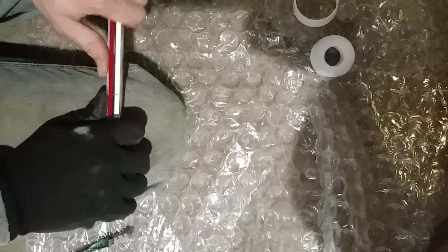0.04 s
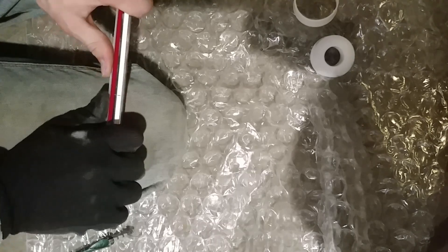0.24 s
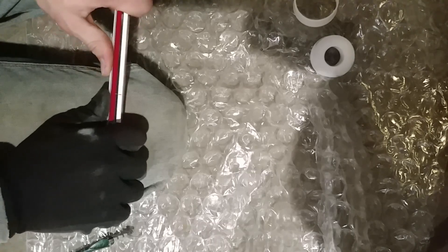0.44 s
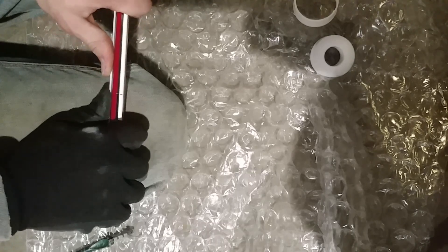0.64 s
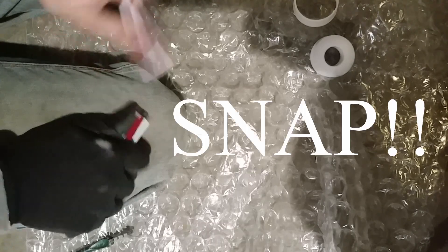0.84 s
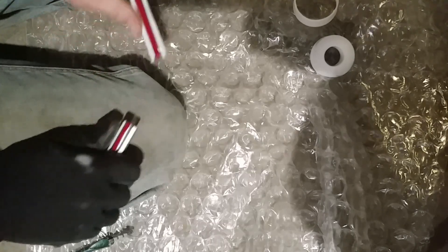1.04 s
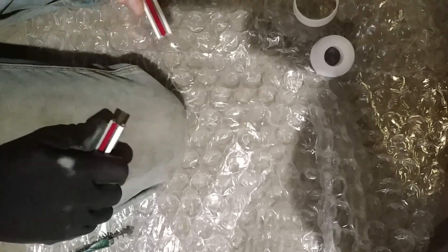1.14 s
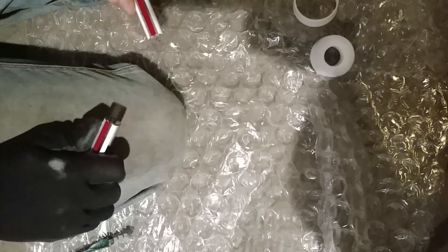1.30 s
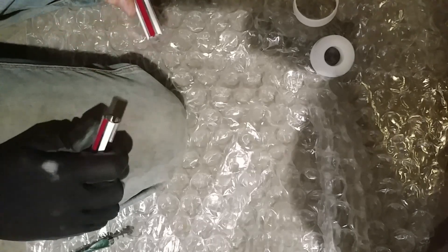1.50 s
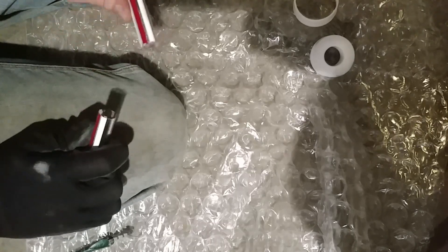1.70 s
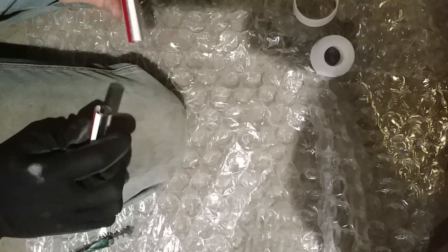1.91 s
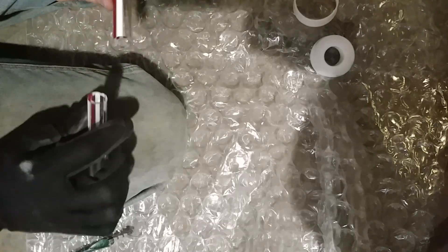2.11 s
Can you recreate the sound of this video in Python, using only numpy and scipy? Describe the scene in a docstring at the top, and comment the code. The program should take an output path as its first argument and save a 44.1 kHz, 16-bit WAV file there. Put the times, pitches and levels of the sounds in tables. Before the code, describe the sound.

A glass tube snaps in the hands at about 0.86 seconds: a very loud, abrupt, brittle crack, close to the stereo microphones, damped at once and trailing under a second of bright workshop reverberation. A short bright click echoes near 0.1, faint glassy clinks follow the break between 1.1 and 1.55, and a duller click sounds at 1.67. Soft hand bumps, quiet air and low wavering hum lie beneath.

```python
"""In a reverberant workshop, a glass tube held in both hands near two microphones snaps at its scored line.
A short fracture burst excites the tube's modes; the grip damps them within milliseconds, and decaying
stereo noise carries the colour on as reverberation. Two short clicks and a few faint clinks are filtered
reverberation alone. Hands bump softly and glass ticks, over shaped air noise and a low, wavering hum."""
import sys
import numpy as np
from scipy import signal
from scipy.fft import rfft, irfft, next_fast_len
from scipy.io import wavfile
from scipy.ndimage import map_coordinates

SR = 44100
rng = np.random.default_rng(int(sys.argv[2]) if len(sys.argv) > 2 else 0)


def master(y):
    """Save y as 16-bit WAV."""
    cut = np.clip(np.atleast_2d(y).T, -1, 1)
    pcm = np.round(cut * 32767)  # scale
    wavfile.write(sys.argv[1], SR, pcm.astype(np.int16))


N = 94947

# The break: its start and the gain of the whole snap
SNAP_S, SNAP_GAIN_DB = .8588, 17.5
# Fracture: time at which the burst's gate has halved; gain of its first sample
BURST_S, FRONT_DB = 0.0026, -5
# Modes of the gripped tube: centre_hz, half_width_hz, gain_db
TUBE_MODES = [(1380, 160, -9), (2657, 140, 1), (4266, 180, 1.5), (4950, 270, -10.5), (6110, 240, -4),
              (8427, 395, 6.5), (9400, 350, -11), (10800, 250, -19), (13170, 800, -12.5)]
# Spectrum of the fracture itself: frequency_hz, gain_db
FRACTURE_SPECTRUM = [(22, -36.5), (50, -16), (120, -18), (400, -19), (900, -18.5), (2000, -13.5),
                     (3400, -12), (5200, -9), (7200, -12.5), (9300, -13), (10300, -25), (12500, -19.5),
                     (16000, -24.5)]
# Straight path to the left microphone: frequency_hz, gain_db
LEFT_PATH = [(100, -3), (700, -4.5), (1100, -2), (1550, 6.5), (2100, 0), (2600, 1.5), (4300, 0),
             (7000, 4.5), (8500, 4), (11000, 2), (15500, 3)]
# Straight path to the right microphone: frequency_hz, gain_db
RIGHT_PATH = [(100, -9), (700, 0), (1100, 0), (1450, 6), (2000, -3), (2600, 2), (4300, -2), (7000, -8.5),
              (8500, -5.5), (11000, -2.5), (15500, -7.5)]
RIGHT_LAG_S = .0003  # later arrival on the right
# Reflections from bench and body, then the room's share of the snap
EARLY_GAIN_DB, EARLY_T60_S, ROOM_GAIN_DB = -3.5, 0.076, 0.5
# Knock of the freed halves in the grip: mode_hz, gain_db, t60_s
KNOCK_MODES = [(1680, -18.5, 0.022), (2490, -21.5, 0.016), (337, -44.5, 0.041), (75, -49.5, 0.049)]
KNOCK_RISE_S = 0.0014  # time constant
# Reverberation time of the workshop: frequency_hz, t60_s
ROOM_T60 = [(150, 0.65), (600, 0.84), (1400, 0.86), (2600, 0.93), (4300, 0.79), (6000, 0.71), (8400, 0.53),
            (13000, 0.27)]
# Left-right correlation of the diffuse field: frequency_hz, correlation
FIELD_CORRELATION = [(60, .85), (250, 0.67), (700, 0.13), (1500, -0.037), (5000, 0.031)]
# Colour of the first clear click: frequency_hz, gain_db
BRIGHT = [(200, -38), (1000, -29.5), (1900, -24.5), (2800, -15), (4000, -5), (5200, 2), (6300, -2.5),
          (7200, -6.5), (8500, 3.5), (9300, 1), (10500, -23), (11800, -15.5), (15500, -31)]
# Colour of the second clear click: frequency_hz, gain_db
DULL = [(200, -50), (700, -31.5), (1300, -19.5), (1900, -6.5), (2480, 4.5), (2800, 2.5), (3020, -9.5),
        (3300, 1.5), (3750, -8.5), (4700, -4), (5400, -9), (5780, -1.5), (6050, -8), (7100, -14),
        (8700, -5.5), (9700, -16.5), (10500, -46), (12200, -21.5), (15500, -35)]
# Clear clicks heard through the room: start_s, gain_db, rise_s, colour (one of the two curves above)
CLICKS = [(.077, 0.5, .022, BRIGHT), (1.664, 5.5, 0.022, DULL)]
# Faint clinks heard through the room: start_s, gain_db, centre_hz, half_width_hz
CLINKS = [(.475, -27, 8900, 500), (1.075, -23, 13700, 1100), (1.21, -15, 8300, 504),
          (1.386, -19.5, 5200, 556), (1.533, -11, 8430, 480)]
CLINK_RISE_S = 0.034
# Soft handling bumps: centre_s, gain_db, gaussian_length_s
BUMPS = [(.003, -61, .015), (.16, -65, .07), (0.437, -61, 0.052), (1.045, -60, .03)]
# Colour of the bumps: frequency_hz, gain_db
BUMP_COLOUR = [(22, -36), (70, -9), (300, -1), (600, -15.5), (1500, -22.5), (6000, -52)]
# Small ticks of glass in the hand: start_s, gain_db
TICKS = [(1.343, -33), (1.53, -36)]
# Colour of the ticks: frequency_hz, gain_db
TICK_COLOUR = [(300, -17.5), (2800, -1.5), (6000, 1), (9000, -13), (14000, -21)]
TICK_T60_S = 0.039
# Relative spectrum of the air noise: frequency_hz, density_db (per Hz)
AIR_SPECTRUM = [(20, -31), (35, -11), (60, -3.5), (110, -7), (170, -11), (280, -11), (420, -15),
                (600, -20.5), (1300, -24.5), (4600, -32), (8500, -30.5), (15500, -35)]
AIR_RMS_DB = -68
# Low hum, before its wavering: pitch_hz, first_rms_db, last_rms_db
HUM = [(121, -72, -74), (220, -75, -86)]
# Recorder: full scale and upper band limit
CEILING, TOP_HZ = 1.0, 16300


def snap():
    """Source-filter principle: fracture and tube modes colour the direct, early and reverberant paths."""
    t = np.arange(N) / SR
    left = coloured(burst(), LEFT_PATH)
    right = at(coloured(burst(), RIGHT_PATH), RIGHT_LAG_S)
    direct = np.array([left, right])
    early_envelope = fade(t, EARLY_T60_S) * np.minimum(t / BURST_S, 1)
    early = energy_one(diffuse() * early_envelope)
    paths = direct + amp(EARLY_GAIN_DB) * early + amp(ROOM_GAIN_DB) * room(rise_s=0.0087)

    def glass(hz):
        """Incoherent addition: the powers of fracture and modes sum."""
        fracture_power = amp(along(FRACTURE_SPECTRUM, hz)) ** 2
        mode_power = sum((amp(db) * peak(hz, centre_hz, half_width_hz)) ** 2
                         for centre_hz, half_width_hz, db in TUBE_MODES)
        return np.sqrt(fracture_power + mode_power)

    return amp(SNAP_GAIN_DB) * at(filtered(paths, glass), SNAP_S)


def burst():
    """Impulsive excitation: a sharp front and milliseconds of dense cracking, with a nearly even spectrum."""
    crackle = rng.standard_normal(1024)
    gate = 1 / (1 + (np.arange(len(crackle)) / SR / BURST_S) ** 6)
    # Gating in time and flattening in frequency alternate until both nearly hold
    for _ in range(4):
        phase = np.angle(rfft(crackle * gate))
        crackle = irfft(np.exp(1j * phase))
    return np.append(amp(FRONT_DB), (crackle * gate)[1:])


def knock():
    """Damped modal vibration: the freed halves kick against the hands, heard close up."""
    t = np.arange(N) / SR
    modes = sum(amp(db) * np.sin(2 * np.pi * hz * t) * fade(t, t60) for hz, db, t60 in KNOCK_MODES)
    kick = at(modes * (1 - np.exp(-t / KNOCK_RISE_S)), SNAP_S)
    return np.array([kick, kick])


def clicks():
    """Reverberant field: clicks and clinks reach the microphones by way of the walls."""
    clear = sum(amp(db) * at(coloured(room(rise_s), colour), start_s)
                for start_s, db, rise_s, colour in CLICKS)
    faint = sum(amp(db) * at(filtered(room(CLINK_RISE_S), lambda hz: peak(hz, centre_hz, half_width_hz)), start_s)
                for start_s, db, centre_hz, half_width_hz in CLINKS)
    return clear + faint


def room(rise_s):
    """Reverberation: the diffuse field builds up, and each frequency decays at its own rate."""
    hz, t, bands = signal.stft(diffuse(), SR, nperseg=256)
    decay = fade(t, along(ROOM_T60, hz)[:, None])
    tail = signal.istft(bands * decay, SR, nperseg=256)[1][:, :N]
    return energy_one(tail * np.minimum(np.arange(N) / SR / rise_s, 1))


def handling():
    """Contact noise: smooth dull bumps of the hands and short decaying ticks of the glass."""
    t = np.arange(N) / SR
    envelope = sum(amp(db) * np.exp(-((t - centre_s) / length_s) ** 2) for centre_s, db, length_s in BUMPS)
    bumps = unit(coloured(diffuse(), BUMP_COLOUR)) * envelope
    ticks = sum(amp(db) * at(energy_one(diffuse() * fade(t, TICK_T60_S)), start_s) for start_s, db in TICKS)
    return bumps + coloured(ticks, TICK_COLOUR)


def room_tone():
    """Stationary noise plus modulated tones: still air and a low, wavering hum."""
    t = np.arange(N) / SR
    hum = 0
    for pitch_hz, first_db, last_db in HUM:
        level_db = np.linspace(first_db, last_db, N) + 3.5 * wobble(t)
        phase = 2 * np.pi * pitch_hz * t + 1.1 * wobble(t)
        hum = hum + amp(level_db) * np.sqrt(2) * np.sin(phase)
    return amp(AIR_RMS_DB) * unit(coloured(diffuse(), AIR_SPECTRUM)) + hum


def wobble(t):
    """Slow random modulation: a smooth curve through 11 random values a second."""
    return map_coordinates(rng.standard_normal(64), [t * 11], mode="mirror")


def diffuse():
    """Spatial coherence: white stereo noise, alike in the bass and nearly unrelated in the treble."""
    correlation = along(FIELD_CORRELATION, np.fft.rfftfreq(N, 1 / SR))
    turn = np.arccos(np.clip(correlation, -1, 1)) / 2
    noise = rfft(rng.standard_normal((2, N)))
    mid, side = irfft(noise * [np.cos(turn), np.sin(turn)], N)
    return np.array([mid + side, mid - side])


def peak(hz, centre_hz, half_width_hz):
    """Resonance: gain is 1 at the centre and halves one half-width away."""
    return 1 / (1 + ((hz - centre_hz) / half_width_hz) ** 2)


def fade(t, t60):
    """Exponential decay: amplitude falls by 60 dB in t60 seconds."""
    return np.exp(-np.log(1000) * t / t60)


def filtered(x, response):
    """Minimum-phase filtering: a causal filter built from its gain by way of the cepstrum."""
    m = 2 * next_fast_len(N)
    gain = np.maximum(response(np.fft.rfftfreq(m, 1 / SR)), 1e-6)
    cepstrum = irfft(np.log(gain), m)
    # Folding negative time onto positive time makes the filter causal
    cepstrum[1:m // 2] *= 2
    cepstrum[m // 2 + 1:] = 0
    return irfft(rfft(x, m) * np.exp(rfft(cepstrum)), m)[..., :N]


def coloured(x, points):
    """Spectral shaping: x through a curve of frequency_hz, gain_db."""
    return filtered(x, lambda hz: amp(along(points, hz)))


def along(points, hz):
    """Logarithmic frequency scale: interpolation of frequency_hz, value points."""
    f, v = np.transpose(points)
    return np.interp(np.log(hz + 1), np.log(f + 1), v)


def at(x, s):
    """Propagation in time: x delayed by s seconds."""
    return np.pad(x, [(0, 0)] * (x.ndim - 1) + [(max(round(s * SR), 0), 0)])[..., :N]


def amp(db):
    """Decibel law: level to amplitude gain."""
    return 10 ** (np.asarray(db) / 20)


def unit(x):
    """Root-mean-square normalization: x scaled to rms 1."""
    return x / np.sqrt(np.mean(x ** 2) + 1e-20)


def energy_one(x):
    """Energy normalization: N samples scaled to a mean energy of 1 a channel."""
    return unit(x) / np.sqrt(N)


def scene():
    """Superposition: all sources add at the two microphones."""
    return snap() + knock() + clicks() + handling() + room_tone()


def record(dry):
    """Transduction: the right side gains low midrange; the recorder clips at full scale and limits the band."""
    right_colour = [(60, .5), (300, 2.5), (700, 3.5), (2000, 1), (9000, -1.2)]  # frequency_hz, gain_db
    pair = np.array([dry[0], coloured(dry[1], right_colour)])
    m = 2 * next_fast_len(N)
    spectrum = rfft(np.clip(pair, -CEILING, CEILING), m)
    return irfft(spectrum * (np.fft.rfftfreq(m, 1 / SR) < TOP_HZ), m)[:, :N]


dry = scene()
out = record(dry)
master(out)
```